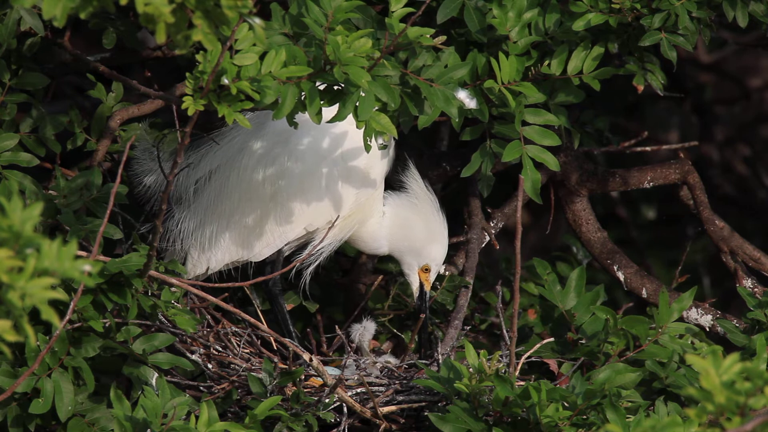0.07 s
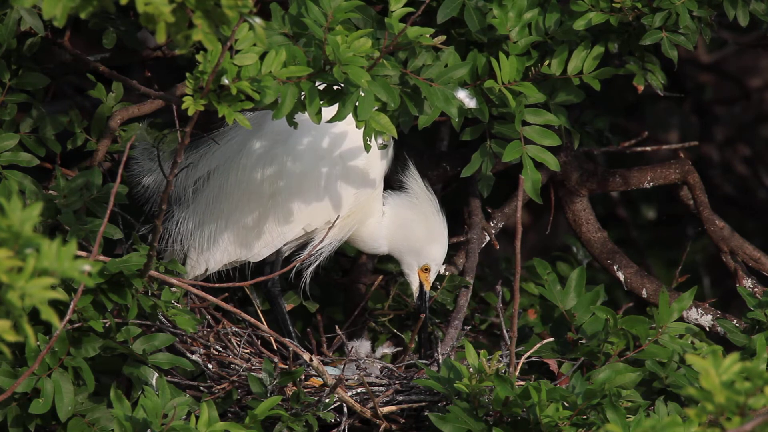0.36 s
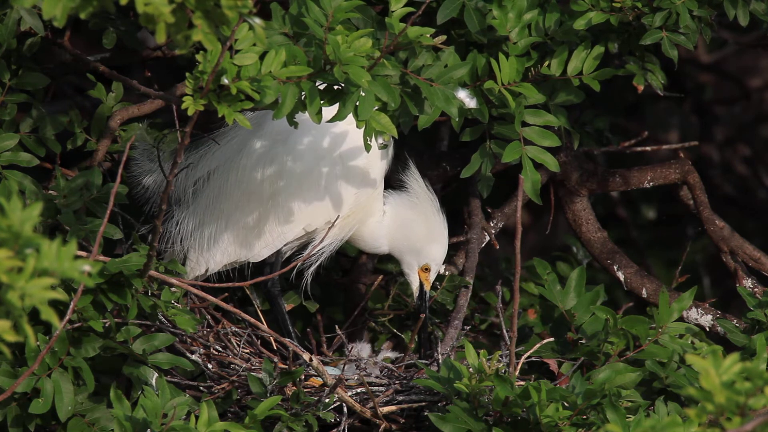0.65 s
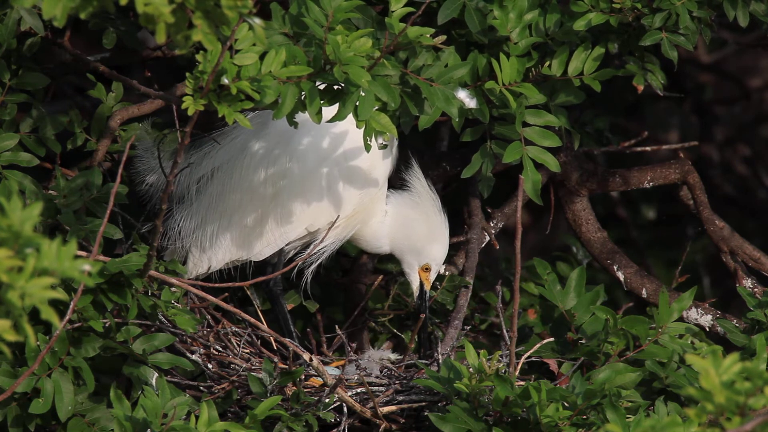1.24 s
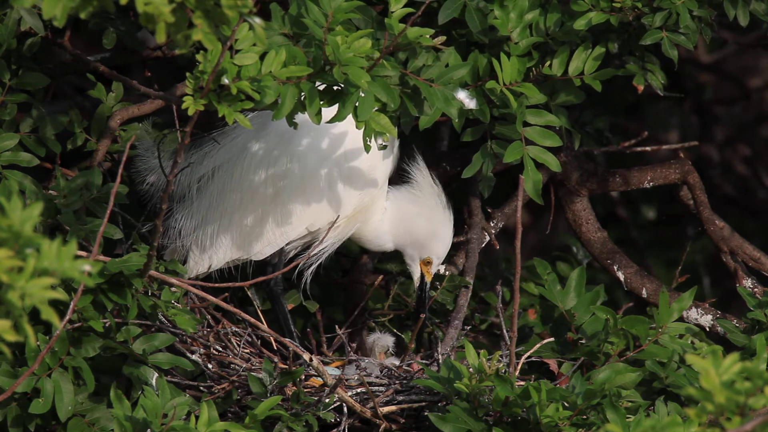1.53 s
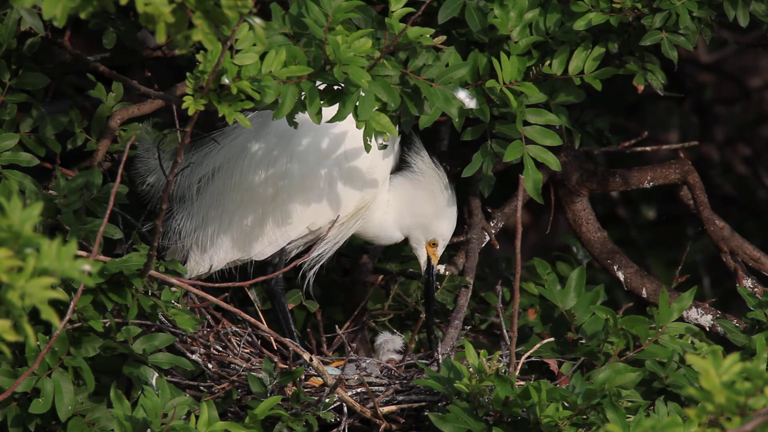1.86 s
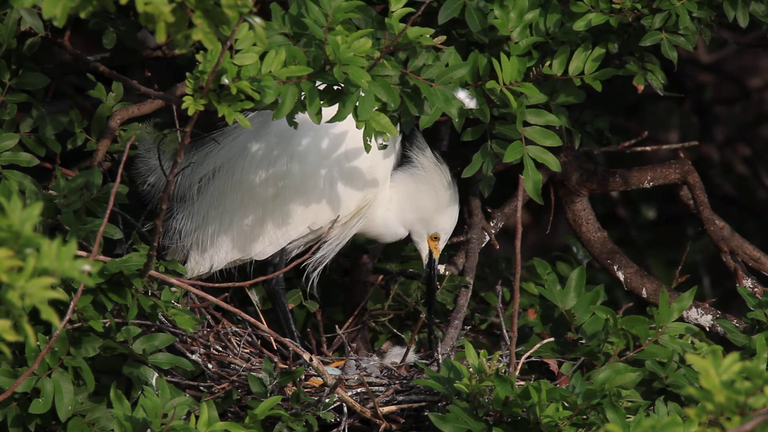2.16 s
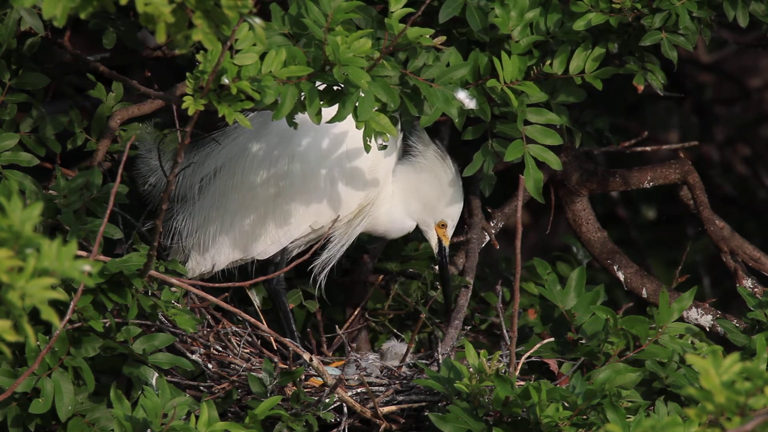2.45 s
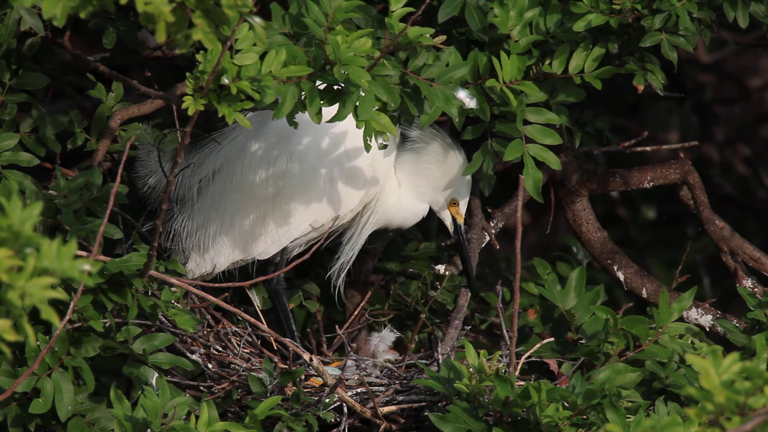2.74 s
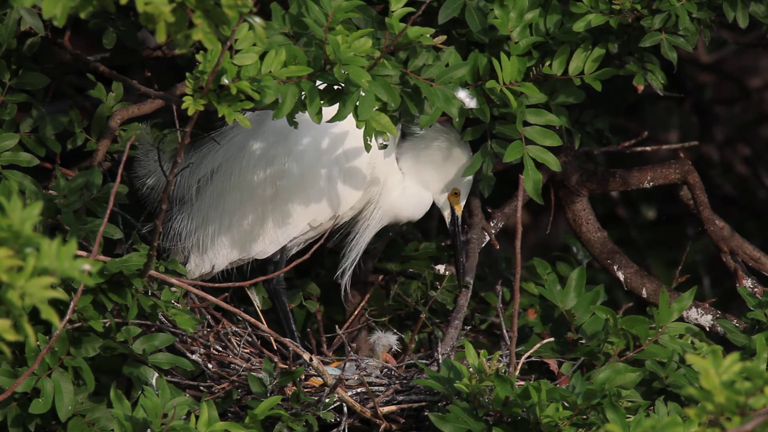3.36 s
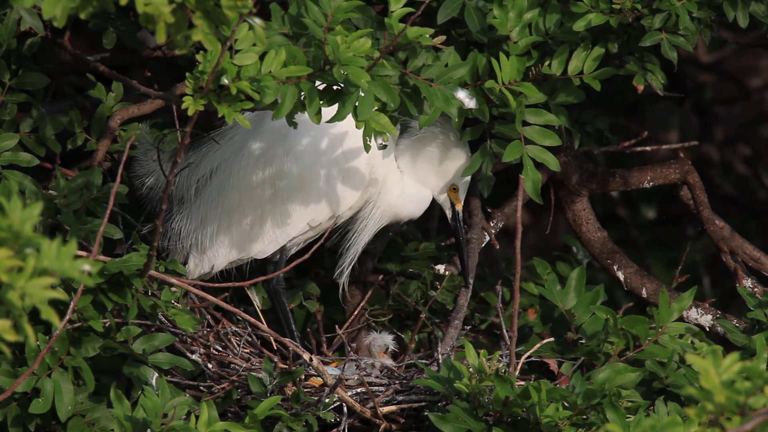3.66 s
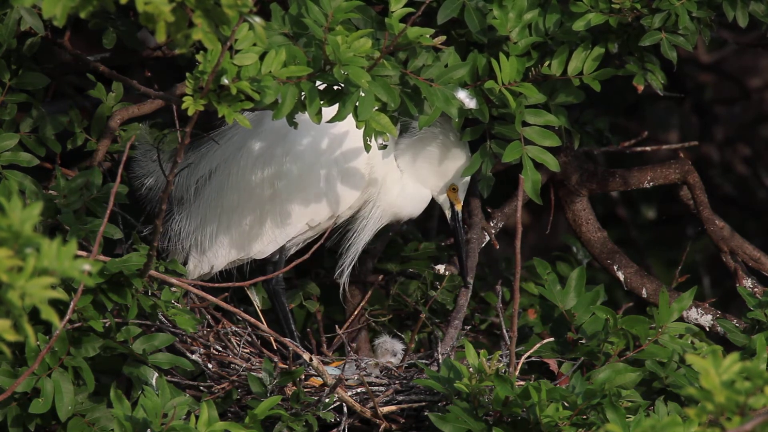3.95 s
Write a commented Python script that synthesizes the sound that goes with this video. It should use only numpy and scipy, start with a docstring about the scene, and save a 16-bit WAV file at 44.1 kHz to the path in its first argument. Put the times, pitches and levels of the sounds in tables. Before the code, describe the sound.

Egret chicks clack close by, short and raspy, about five times a second, pausing briefly near 0.8 and 2.6 seconds. A high insect buzz throbs throughout. From 0.6 to 1.9 seconds a songbird further off repeats a whistled phrase amid small birds' chirps. A stick knocks and a twig snaps around 1 second; more twigs tick after 2.7. Soft outdoor air and distant engines lie underneath.

```python
"""At a stick nest among leafy trees, one microphone close to begging egret chicks.
They clack about five times a second, each clack a shaky tone plus rasping puffs through the throat.
Twigs tick, a stick knocks and an insect's rapid clicks buzz in throbs. Further off a songbird
repeats a whistled phrase while small birds whistle, chip and chatter, echoed by the trees.
Under it all lie outdoor air and the drone of distant engines."""
import sys
import numpy as np
from scipy import signal
from scipy.fft import rfft, irfft
from scipy.io import wavfile
from scipy.ndimage import uniform_filter1d

SR = 44100
rng = np.random.default_rng(int(sys.argv[2]) if len(sys.argv) > 2 else 0)


def wrap_up_sound(samples):
    """Save the sound to the file named by the first command line argument, as 16-bit audio."""
    columns = np.atleast_2d(samples).T
    # keep every value between -1 and 1, then stretch to whole-number steps
    tamed = np.clip(columns, -1, 1)
    steps = np.round(tamed * 32767).astype(np.int16)
    wavfile.write(sys.argv[1], SR, steps)


N = 176400
TIME = np.arange(N) / SR

# Begging calls from the nest: start_s, level_db, pitch_hz, length_s, roughness (0-1)
CHICK_CALLS = [(0.128,-34,2200,0.022,0.7),(0.34,-31.5,2193,0.021,0.7),(0.545,-32,2367,0.023,0.83),(1.007,-33.5,2450,0.016,0.7),
               (1.201,-33,2457,0.026,0.45),(1.4047,-31,2476,0.02,0.38),(1.6137,-30,2460,.024,0.4),(1.8144,-29,2422,0.023,0.31),
               (2.024,-31.5,2472,0.022,0.39),(2.227,-31,2436,0.02,0.38),(2.423,-30.5,2450,0.023,0.27),(2.845,-36.5,2470,0.0176,0.3),
               (3.0497,-33.5,2417,0.018,0.35),(3.26,-30,2480,0.021,0.3),(3.472,-32,2420,0.022,0.39),(3.6755,-29.5,2480,0.0193,0.33),(3.883,-34.5,2430,0.024,0.38)]
# Throat resonances at the usual pitch: centre_hz, width_hz, gain_db
THROAT_RESONANCES = [(1278,410,-5.5),(2417,640,-2),(3410,530,-1.5),(4380,750,-2.5),(5440,760,-10),(6940,1700,-15)]
USUAL_PITCH_HZ, PUFF_HZ = 2448, 295.7
ATTACK_S, RELEASE_S, SAG_DB = 0.0016, 0.004, 3.5
BLIP_HZ, BLIP_DB, BLIP_S = 2170, -14, 0.0033

def chicks():
    """Close by: a shaky tone and puffs through the throat. The head moves, so each scatters anew."""
    out, t = np.zeros(N), TIME[:4096]
    bands = len(THROAT_RESONANCES)
    for start, db, hz, length, roughness in CHICK_CALLS:
        progress = np.minimum(t / length, 1.2)
        # The pitch arches a little and drops as the call ends.
        pitch = hz * (1 + 0.018 * np.sin(np.pi * progress) - 0.0275 * np.minimum(progress ** 6, 1.3))
        shaky_hz = pitch * (1 + 0.046 * wander(len(t), 892))
        tone = sine(shaky_hz) + amp(-24.5) * sine(shaky_hz / 2)
        tone = unit(tone * (1 + 0.4 * wander(len(t), 610)))
        cycles = np.cumsum(PUFF_HZ * (1 + 0.42 * wander(len(t), 300))) / SR
        puffs = (0.4 + np.exp(-(cycles % 1) / 0.26)) * rng.standard_normal((bands, len(t)))
        # The resonances differ between calls and slide within each one.
        gape = 1 + 0.03 * rng.uniform(-1, 1, (bands, 1))
        slide = 0.08 * rng.uniform(-1, 1, (bands, 1)) * (progress - 0.5)
        tunings = (gape + slide) * pitch / USUAL_PITCH_HZ
        rasp = sum(amp(gain) * resonate(puff, centre * tuning, width)
                   for puff, tuning, (centre, width, gain) in zip(puffs, tunings, THROAT_RESONANCES))
        rasp_share = np.clip(roughness + 0.26 * (progress ** 2 - 0.5), 0, 1)
        voice = np.sqrt(1 - rasp_share) * tone + np.sqrt(rasp_share) * unit(rasp)
        release = np.exp(-np.maximum(t - length * 0.88, 0) / RELEASE_S)
        envelope = np.minimum(t / ATTACK_S, 1) * amp(-SAG_DB * progress) * release
        # The clack closes on a lower blip.
        blip_envelope = amp(BLIP_DB) * np.exp(-((t - length - BLIP_S) / BLIP_S) ** 2)
        blip = blip_envelope * sine(BLIP_HZ * (1 + 0.046 * wander(len(t), 930)))
        add(out, start, amp(db) * leaves(envelope * voice + blip))
    return out + amp(-13.5) * trees(out)


# Note shapes, timed from each note's start: time_s, pitch_hz, gain_db
HIGH_NOTE = [(0,3700,1),(.006,4140,1),(0.026,4260,2),(0.046,4380,7.5),(.066,4350,-0.5),(.072,4345,-22)]
LAST_HIGH_NOTE = [(0,3540,3),(.016,4290,-2),(.028,4220,5),(.048,4210,1.5),(.06,4270,-12)]
SCOOPED_NOTE = [(0,3067,-12),(.008,2903,1),(0.024,2787,-0.5),(0.035,2713,0),(.046,2876,0.5),(0.053,3080,6.5),(.062,3470,-6),(0.07,3640,1.5)]
LOW_NOTE = [(0,2316,-3),(0.013,2265,-4),(.025,2220,2.5),(.034,2140,4)]
RISING_NOTE = [(0,2216,-4),(0.011,2361,-3.5),(0.023,2754,5.5),(.032,2830,-18),(0.036,2960,-24)]
# The four notes' places in a phrase: delay_s
NOTE_DELAYS = [0,.079,.18,.238]
# Song phrases: start_s, high_db, scooped_db, low_db, rising_db
SONG_PHRASES = [(0.647,-50.5,-41.5,-47,-41),(0.952,-48.5,-40.5,-48,-38.5),(1.256,-45,-38.5,-48.5,-36.5),(1.562,-44,-38.5,-72,-68)]

def songbird():
    """Further off: a rolling four-note phrase grows louder; the last all but drops two notes."""
    out = np.zeros(N)
    for k, (start, *levels) in enumerate(SONG_PHRASES):
        high = LAST_HIGH_NOTE if k == len(SONG_PHRASES) - 1 else HIGH_NOTE
        for delay, note, db in zip(NOTE_DELAYS, (high, SCOOPED_NOTE, LOW_NOTE, RISING_NOTE), levels):
            add(out, start + delay, amp(db) * whistle(note))
    return leaves(out) + amp(-9.5) * trees(out)


# Ticking twigs: start_s, body_db, snap_db, pitch_hz
TWIG_TICKS = [(0.0113,-58,-36,2000),(.833,-51,-47,2010),(1.0635,-33,-49,2700),(2.72,-46,-70,2020),(2.785,-40.5,-65,2780),(2.969,-48,-61,2300),
              (3.1299,-39.5,-60,2110),(3.15,-42.5,-68,1530),(3.608,-48,-58,1600),(3.6417,-43,-62,2000),(3.674,-47,-41.5,2020)]
# A twig's resonances: pitch_ratio, width_hz, gain_db
TWIG_MODES = [(0.559,600,-3),(1.01,900,2),(1.45,1500,-9)]
# Spectrum of the snap: frequency_hz, gain_db
SNAP_SPECTRUM = [(2000,-14),(5000,-9.5),(7000,4),(9000,0.5),(12000,-11.5),(16000,-33)]

def twigs():
    """Close, dry ticks: a woody knock and a bright snap, both dying at once."""
    out, t = np.zeros(N), TIME[:1024]
    envelope = np.minimum(t / 0.00023, 1) * np.exp(1 - t / 0.0012)
    for start, body_db, snap_db, hz in TWIG_TICKS:
        push, crack = rng.standard_normal((2, len(t)))
        body = sum(amp(db) * resonate(envelope * push, np.full(len(t), hz * ratio), width)
                   for ratio, width, db in TWIG_MODES)
        snap = envelope * colour(crack, SNAP_SPECTRUM)
        tick = amp(body_db) * unit(body) + amp(snap_db) * unit(snap)
        add(out, start, tick * np.sqrt(np.mean(envelope ** 2)))
    return out


def stick(start_s=1, level_db=-36.5, pitch_hz=1033, decay_s=0.0052):
    """In the nest: one hollow knock of a thicker stick."""
    out, t = np.zeros(N), TIME[:2048]
    envelope = np.minimum(t / 0.0012, 1) * np.exp(-t / decay_s)
    add(out, start_s, amp(level_db) * envelope * sine(np.full(len(t), pitch_hz)))
    return out


# The nearer insect's throbs: start_s, length_s, level_db
INSECT_THROBS = [(0,0.17,-46),(0.204,0.25,-46.5),(0.512,0.18,-46),(0.72,0.24,-46.5),(1.006,.14,-43.5),(1.253,0.12,-46),(1.45,0.17,-47.5),(1.695,0.17,-44.5),
                 (1.954,0.19,-46),(2.167,0.15,-46),(2.419,0.16,-44),(2.693,.16,-44),(2.93,0.13,-45),(3.157,0.16,-45),(3.385,0.17,-45.5),(3.67,0.21,-44.5),(3.952,0.11,-44.5)]
# Spectra of its buzz and of the far chorus: frequency_hz, gain_db
BUZZ_SPECTRUM = [(4700,-68),(5250,-11),(5500,-8.5),(5750,1),(5920,2.5),(6100,0.5),(6250,-3),(6450,-11.5),(7000,-30),(8600,-29.5),(10000,-46),(11500,-32),(13000,-51)]
CHORUS_SPECTRUM = [(4400,-30),(5150,-15),(5880,-6),(6090,4),(6300,-9),(6500,-24),(9000,-46)]

def insect(click_hz=163.6, edge_s=0.06):
    """Rapid clicks ring a narrow band in throbs, over a steady chorus further away."""
    throbs = sum(amp(db) * np.clip(np.minimum(TIME - start, start + length - TIME) / edge_s + 0.5, 0, 1)
                 for start, length, db in INSECT_THROBS)
    cycles = np.cumsum(click_hz * (1 + 0.008 * wander(N, 29.3))) / SR
    clicks = np.exp(0.27 * (np.cos(2 * np.pi * cycles) + np.cos(np.pi * cycles)))  # strong, weak in turn
    buzz = colour(clicks * rng.standard_normal(N), BUZZ_SPECTRUM)
    chorus = colour(rng.standard_normal(N), CHORUS_SPECTRUM)
    return throbs * buzz + amp(-49.5) * chorus


# Single calls around the nest: time_s, pitch_hz, level_db
LEVEL_CALL = [(0,3207,-49),(.05,3180,-45),(0.112,3161,-43.5),(.125,3060,-65)]
THIN_CALL = [(.858,6670,-48),(.885,7050,-47.5),(0.916,8030,-51),(.99,8000,-63)]
LOW_CALL = [(.87,2150,-54),(.93,2065,-51),(1.0,2040,-59)]
# The level whistle's diffuse echo lingering in the trees: time_s, pitch_hz, level_db
LEVEL_CALL_ECHO = [(0.121,3130,-58),(0.202,3090,-50),(.35,3060,-53.5),(.55,3000,-59),(.72,3210,-50)]
# Faint upward flicks of song: start_s, level_db, pitch_hz
SONG_FLICKS = [(0.042,-44,2780),(0.446,-40,3300),(0.57,-41,2690)]

def other_birds(flick_peak_s=0.0246, twitter_count=40, twitter_db=-53):
    """Deeper in the trees: whistles, the first one's lingering echo, upward flicks and faint twitter."""
    out = np.zeros(N)
    add(out, LEVEL_CALL[0][0], whistle(LEVEL_CALL, waver=0.0046))
    add(out, THIN_CALL[0][0], whistle(THIN_CALL, waver=0.02))
    add(out, LEVEL_CALL_ECHO[0][0], noise_band(LEVEL_CALL_ECHO, width_hz=350))
    add(out, LOW_CALL[0][0], whistle(LOW_CALL))
    for start, db, hz in SONG_FLICKS:
        flick = [(0, hz * 0.833, db - 16), (flick_peak_s, hz, db),
                 (1.53 * flick_peak_s, hz * 1.2, db - 13)]
        add(out, start, whistle(flick, waver=0.032))
    for when, height, glide, strength in rng.random((twitter_count, 4)):
        hz, db = 2050 + 1400 * height, twitter_db + 12 * (strength - 0.5)
        twitter = [(0, hz, db - 10), (0.005, hz, db), (0.014, hz * (0.85 + 0.3 * glide), db - 14)]
        add(out, when * N / SR, whistle(twitter, waver=0.03))
    return leaves(out) + amp(-9) * trees(out)


# Small birds' chips, ahead of the band filter: start_s, middle_db, top_hz, length_s
HIGH_CHIPS = [(0.737,-55,9300,0.027),(0.762,-51,8000,0.03),(1.356,-60,8200,0.021),(1.825,-60,8400,0.021),(2.351,-59,8400,0.033),(3.415,-59,7750,0.03)]

def chips(fall=0.15):
    """Out in the trees: high, husky chips that fall in pitch."""
    out = np.zeros(N)
    for start, db, hz, length in HIGH_CHIPS:
        arc = [(0, hz, db + 6), (length / 2, hz * (1 - fall / 2), db), (length, hz * (1 - fall), db + 15)]
        add(out, start, noise_band(arc, width_hz=1200))
    out = signal.sosfilt(signal.butter(4, [6400, 9300], "band", fs=SR, output="sos"), out)
    return leaves(out) + amp(-4.5) * trees(out)


# Distant chatter, loudest while the songbird sings: time_s, level_db
CHATTER_LEVELS = [(0,-60),(.85,-50),(1.6,-60),(1.9,-67),(4,-72)]

def chatter(count=260, low_hz=2150, high_hz=3300, length_s=0.0251):
    """Far birds: many short glides that reach the microphone only as echo."""
    out = np.zeros(N)
    for when, height, glide in rng.random((count, 3)):
        hz = low_hz * (high_hz / low_hz) ** height
        end_hz = hz * (1 + 0.138 * (2 * glide - 1))
        add(out, when * N / SR, whistle([(0, hz, 0), (length_s, end_hz, 0)]))
    return amp(np.interp(TIME, *np.transpose(CHATTER_LEVELS))) * unit(trees(out))


# Spectrum of the outdoor air: frequency_hz, gain_db
AIR_SPECTRUM = [(18,-39),(50,-6.5),(92,-4),(119,-4.5),(245,-13),(300,-21.5),(549,-15),(680,-19),(1130,-22.5),(1770,-27),(2330,-30.5),(3000,-33.5),(4680,-38.5),(6700,-37.5),(8600,-38.5),(9600,-46.5),(15500,-52)]

def air(level_db=-40, patch_db=1.04):
    """All around: low rumble and soft leaf hiss with drifting patches."""
    spectra = signal.stft(rng.standard_normal(N), nperseg=1024, noverlap=768)[2]
    patches = uniform_filter1d(rng.standard_normal(spectra.shape), size=10, axis=0)
    patches = unit(uniform_filter1d(patches, size=12, axis=1))
    hiss = signal.istft(spectra * amp(patch_db * patches), nperseg=1024, noverlap=768)[1][:N]
    return amp(level_db) * colour(hiss, AIR_SPECTRUM)


# Engine tones: pitch_hz, start_db, turn_db, end_db
ENGINE_TONES = [(59.17,-38,-43,-60),(118.5,-41,-48.5,-67.5),(95.9,-61,-46,-46),(175.1,-51,-49.5,-87)]
# Spectrum of the fading engine's roar: frequency_hz, gain_db
ROAR_SPECTRUM = [(60,-4),(120,1.5),(220,-8),(400,-11),(700,-14.5),(1100,-15),(1800,-29.5),(3500,-43.5)]
# Its fade: time_s, level_db
ROAR_FADE = [(0,-45.5),(1.3,-46),(2.2,-56.5),(4,-55.5)]

def engines(turn_s=1.57):
    """In the distance: wavering low tones and a soft roar. One engine fades as another comes up."""
    drone = np.zeros(N)
    for hz, *levels in ENGINE_TONES:
        db = np.interp(TIME, [0, turn_s, N / SR], levels) + 1.2 * wander(N, 8.9)
        drone += amp(db) * sine(hz * (1 + 0.0128 * wander(N, 13)))
    roar = colour(rng.standard_normal(N), ROAR_SPECTRUM)
    return drone + amp(np.interp(TIME, *np.transpose(ROAR_FADE))) * roar


def leaves(x, decay_s=0.011, echo_db=-9.5):
    """A sound plus its quick scatter from nearby branches."""
    t = TIME[:4096]
    echoes = rng.standard_normal(len(t)) * (rng.random(len(t)) < 0.03)
    echoes *= np.exp(-t / decay_s) * (t > 0.003)
    return x + amp(echo_db) * signal.fftconvolve(x, echoes / np.linalg.norm(echoes))[:len(x)]


# Time the wood's echo takes to fall 60 dB: frequency_hz, decay_s
WOOD_DECAY = [(200,0.55),(2500,0.21),(4500,0.72),(8000,0.64),(12000,0.18)]

def trees(x):
    """Diffuse echo of the surrounding wood, each band dying at its own speed."""
    hz, t, spectra = signal.stft(rng.standard_normal(SR), SR, nperseg=256)
    decay = amp(-60 * t / at_frequency(WOOD_DECAY, hz)[:, None])
    tail = signal.istft(spectra * decay, SR, nperseg=256)[1]
    return signal.fftconvolve(x, tail / np.linalg.norm(tail))[:N]


def contour(points, fade_s):
    """A note's envelope and pitch curve from (time_s, pitch_hz, level_db) points."""
    times, hz, db = np.transpose(points)
    t = np.arange(times[0], max(times[-1], times[0] + 0.01), 1 / SR)
    fade = np.clip(np.minimum(t - t[0], t[-1] - t) / fade_s, 0, 1)
    return fade * amp(np.interp(t, times, db)), np.interp(t, times, hz)


def whistle(points, waver=0.008):
    """A near-pure note with a slightly unsteady pitch."""
    envelope, hz = contour(points, fade_s=0.00093)
    return envelope * sine(hz * (1 + waver * wander(len(hz), 528.5)))


def noise_band(points, width_hz):
    """Noise in a gliding resonance."""
    envelope, hz = contour(points, fade_s=0.0013)
    return envelope * resonate(rng.standard_normal(len(hz)), hz, width_hz)


def resonate(x, hz, width_hz):
    """A steep resonance that follows a pitch curve, at rms 1."""
    carrier = np.exp(2j * np.pi * np.cumsum(hz) / SR)
    pole = np.exp(-np.pi * width_hz / SR)
    return unit((carrier * signal.lfilter([1], [1, -2 * pole, pole * pole], x / carrier)).real)


def sine(hz):
    """A sine that follows a pitch curve, at rms 1."""
    return np.sqrt(2) * np.sin(2 * np.pi * (np.cumsum(hz) / SR + rng.random()))


def wander(size, hz):
    """A random curve with hz turning points a second."""
    return np.interp(np.arange(size) * hz / SR, np.arange(4096), rng.standard_normal(4096))


def colour(x, spectrum):
    """Filters a sound by a spectrum, at rms 1."""
    gain = amp(at_frequency(spectrum, np.fft.rfftfreq(len(x), 1 / SR)))
    return unit(irfft(rfft(x) * gain, len(x)))


def at_frequency(points, hz):
    """Reads a table on a log-frequency axis."""
    frequencies, values = np.transpose(points)
    return np.interp(np.log(hz + 1), np.log(frequencies + 1), values)


def add(mix, start_s, sound):
    """Mixes a sound in at a time."""
    part = mix[max(round(start_s * SR), 0):][:len(sound)]
    part += sound[:len(part)]


def amp(db):
    """Decibels to gain."""
    return 10 ** (np.asarray(db) / 20)


def unit(x):
    """Scales to rms 1."""
    return x / np.sqrt(np.mean(x ** 2) + 1e-20)


def scene():
    """All sources at one microphone by the nest."""
    birds = chicks() + songbird() + other_birds() + chatter() + chips()
    return (birds + insect() + air() + engines() + twigs() + stick())[None]


def record(dry, cutoff_hz=15720):
    """The recorder's band limit."""
    lowpass = signal.firwin(511, cutoff_hz, window=("kaiser", 9), fs=SR)
    return signal.oaconvolve(dry, lowpass[None], "same")


dry = scene()
out = record(dry)
wrap_up_sound(out)
```